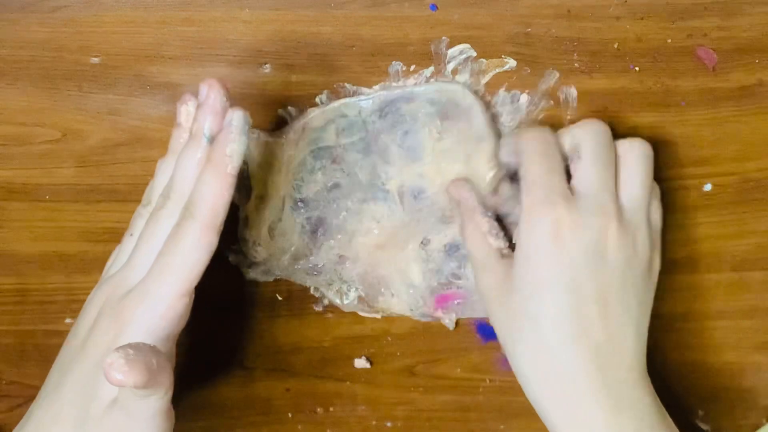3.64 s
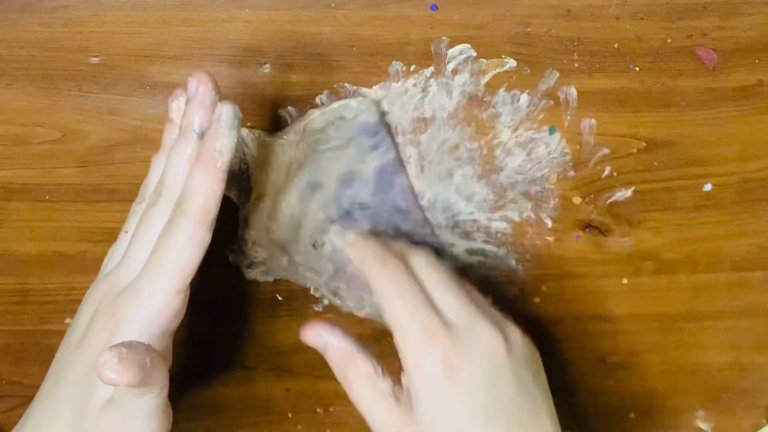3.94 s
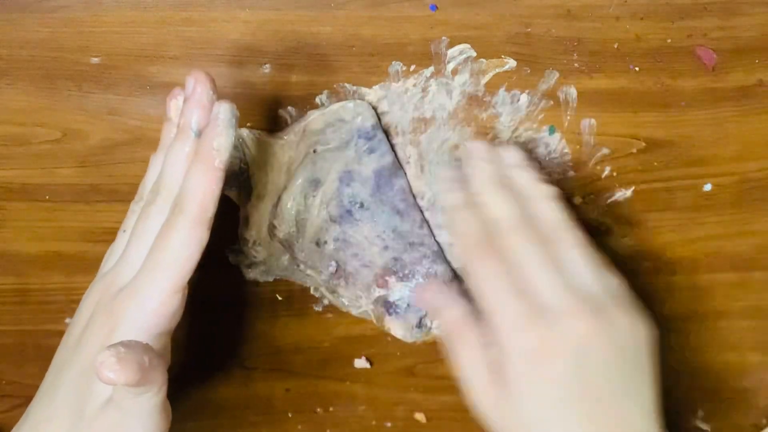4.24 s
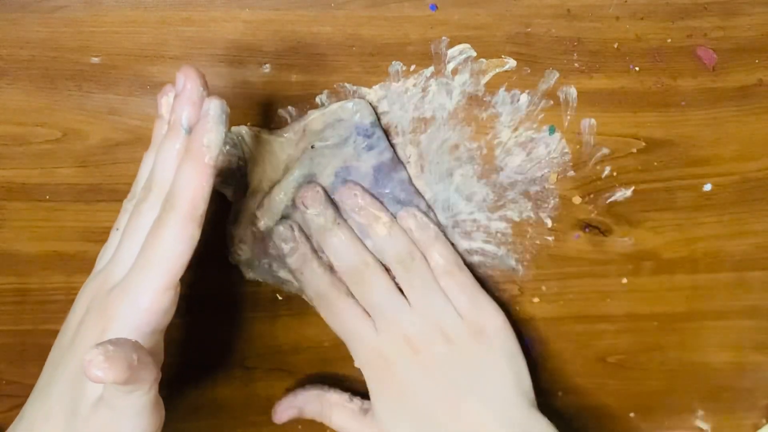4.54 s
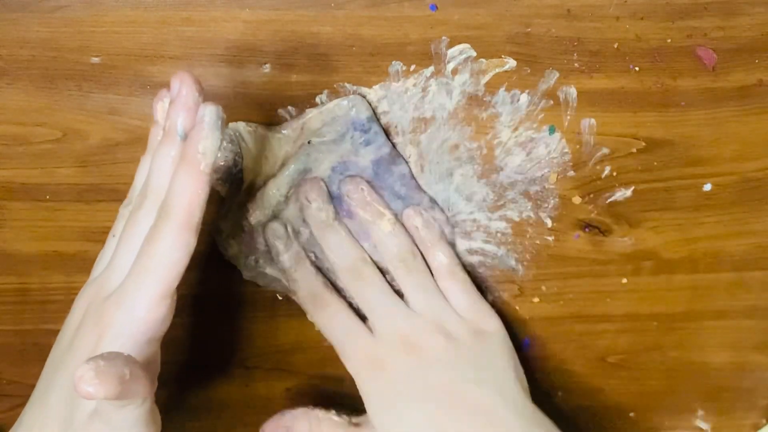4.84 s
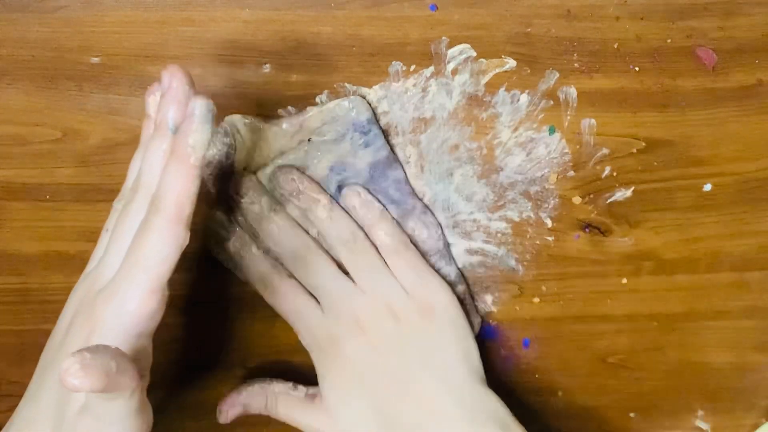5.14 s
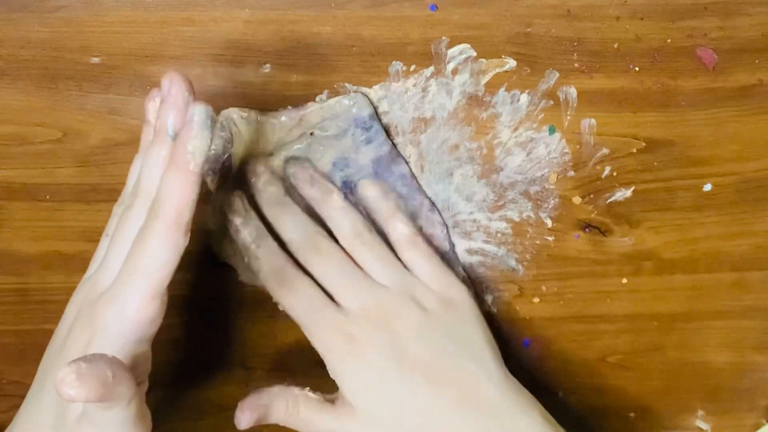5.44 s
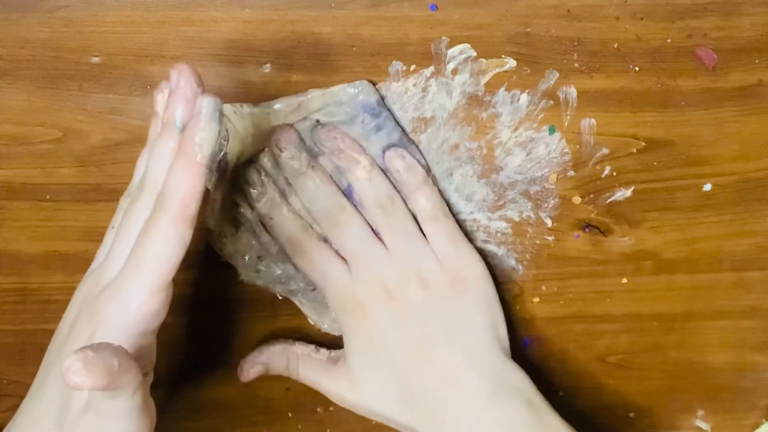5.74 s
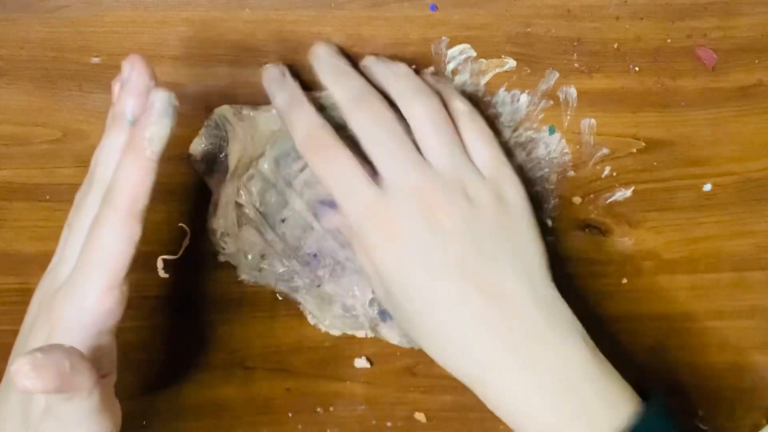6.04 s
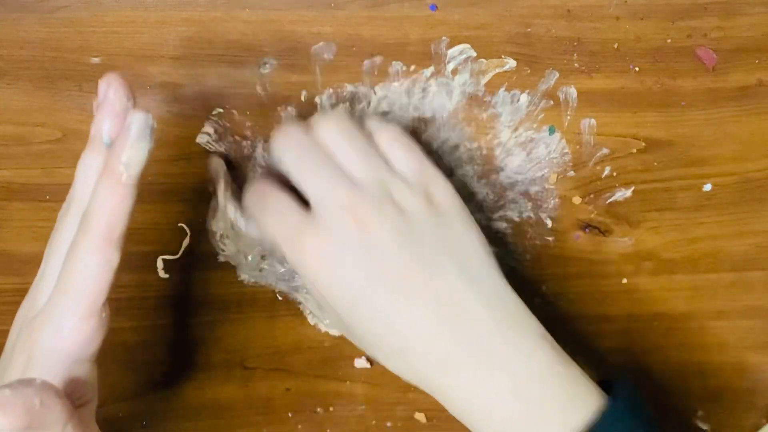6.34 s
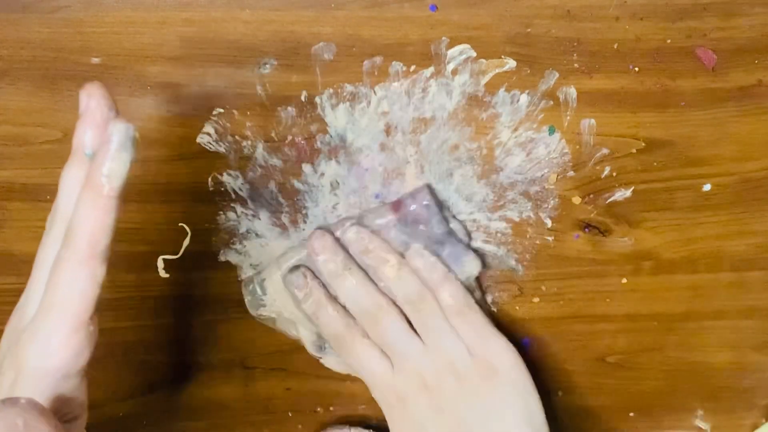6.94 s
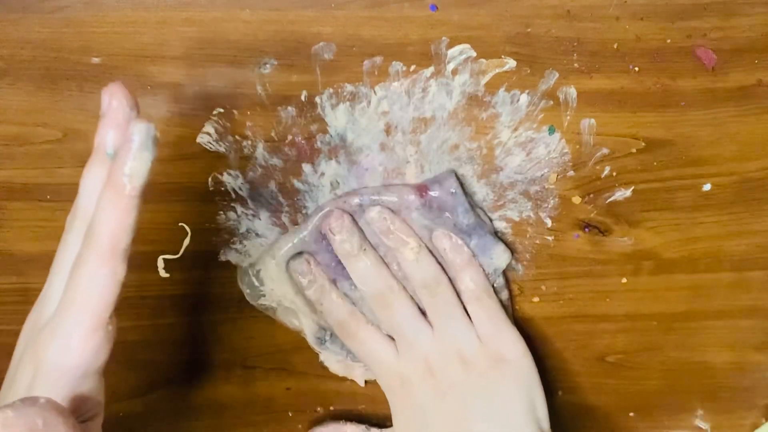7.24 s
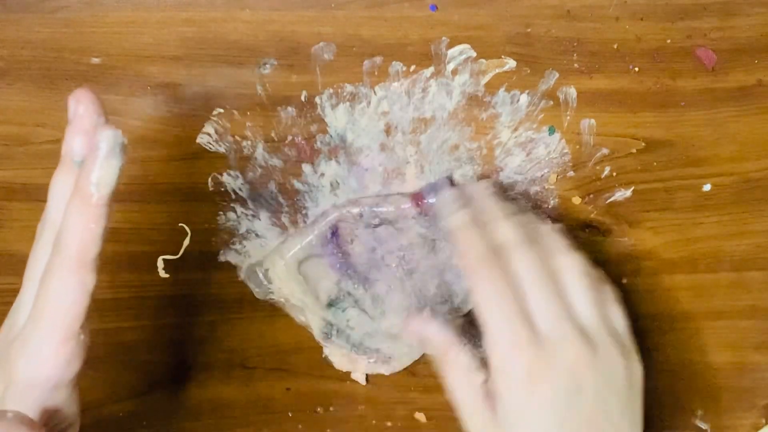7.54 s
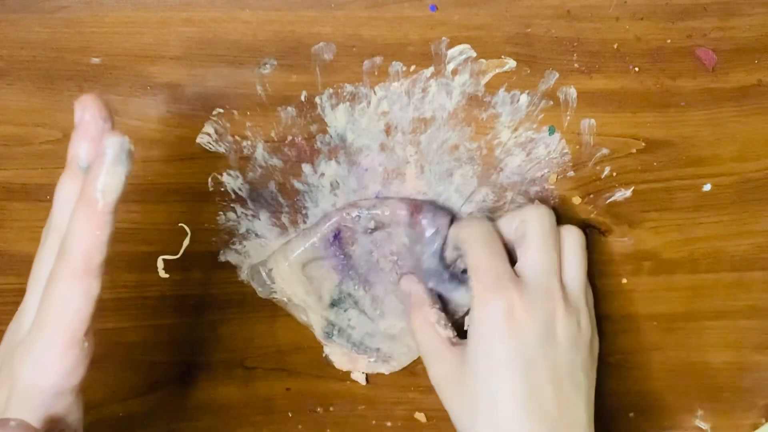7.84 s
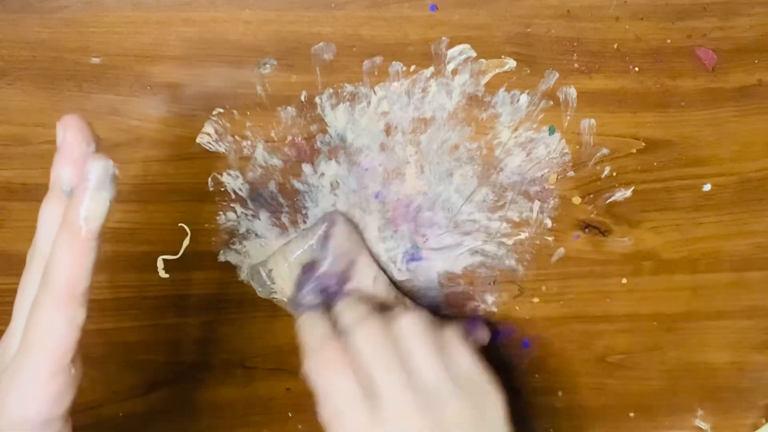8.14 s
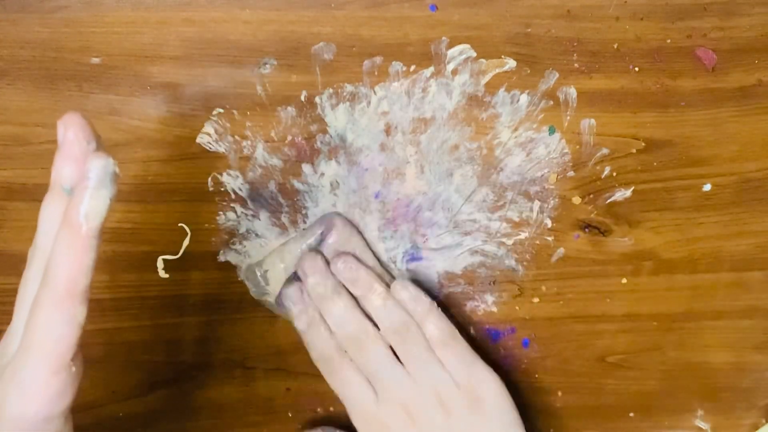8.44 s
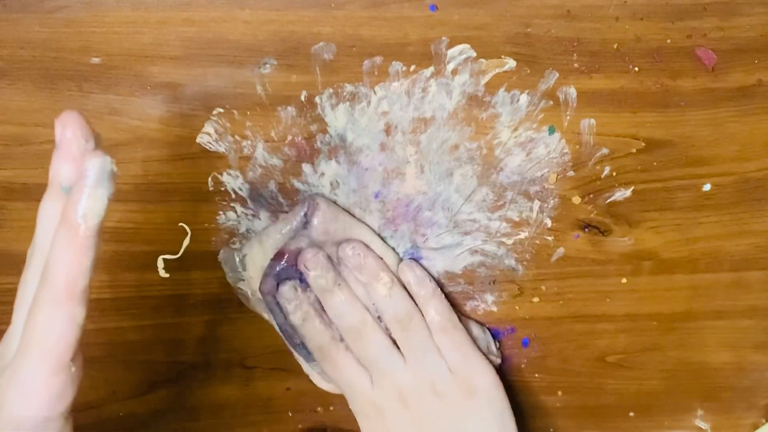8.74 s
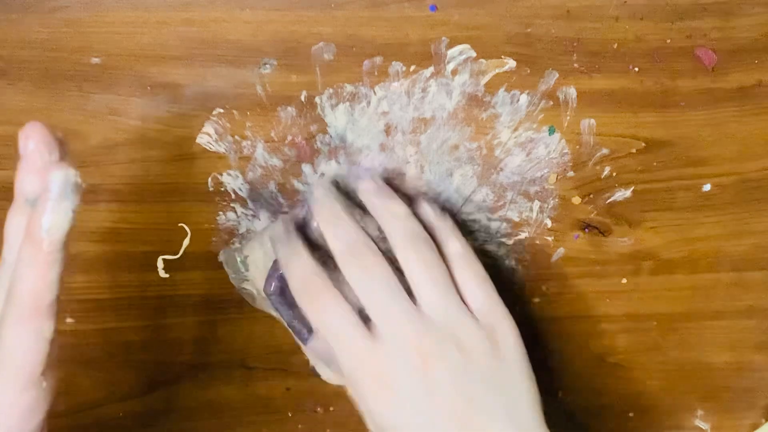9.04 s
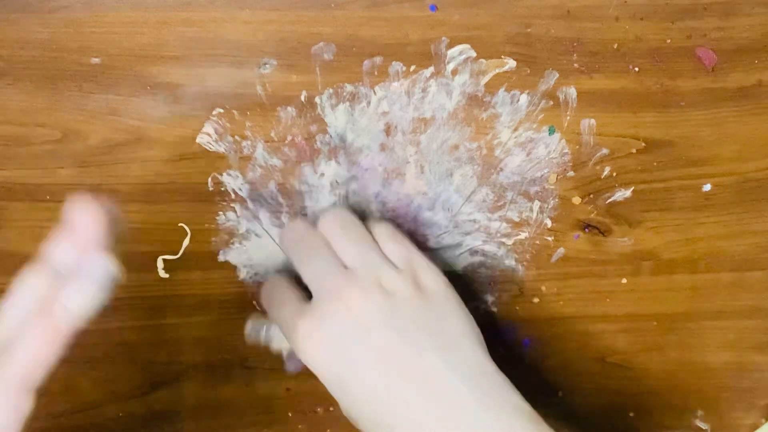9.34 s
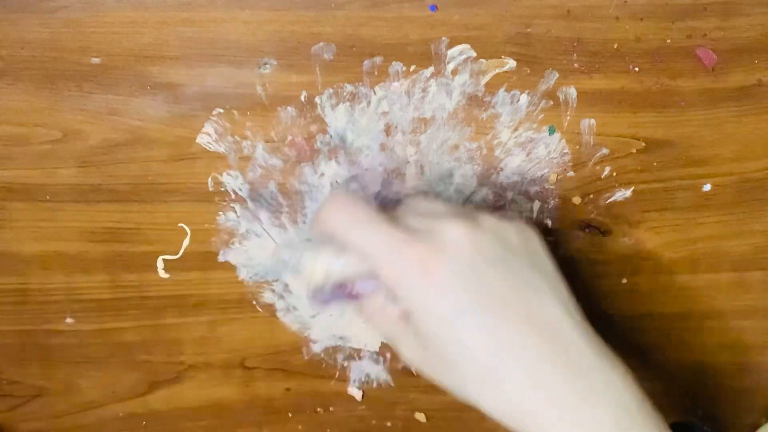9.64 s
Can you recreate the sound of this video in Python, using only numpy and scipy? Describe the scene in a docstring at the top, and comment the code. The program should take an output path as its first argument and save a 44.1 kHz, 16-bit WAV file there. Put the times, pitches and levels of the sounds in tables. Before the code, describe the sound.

Fingers knead wet slime on a wooden table, close to the microphone in a small hard room. Air pockets burst in short sticky pops, often in pairs, each with a tiny crackle and a soft thud from the table. Later the pops thin out, leaving faint skin rubbing, a few soft bubble blips and two small clinks near the end. Distant crickets chirp faintly over a low room rumble.

```python
"""Wet pops: air pockets burst as fingers knead slime on a wooden table, close up in a small hard room.
In each pop the film tears in a spray of tiny snaps, the pocket rings and the table top thuds.
Two far crickets chirp over a low room rumble, and skin rubs softly over the slime.
Late on come a faint high ringing tink, short soft bubble blips and two clinks of something small."""
import sys
import numpy as np
from scipy import signal
from scipy.fft import rfft, irfft, next_fast_len
from scipy.io import wavfile
from scipy.ndimage import uniform_filter1d

SR = 44100
rng = np.random.default_rng(int(sys.argv[2]) if len(sys.argv) > 2 else 0)


def generate_wav(sig):
    """Save sig (samples, or channels by samples) to the path in sys.argv[1] as 16-bit PCM at SR."""
    pcm = np.round(np.clip(np.atleast_2d(sig).T, -1, 1) * 32767).astype(np.int16)
    wavfile.write(sys.argv[1], SR, pcm)


N = 431738
TIME_S = np.arange(N) / SR

# bursting pockets: start_s, tear_s, thud_db, ring_db, snap_db, lower_ring_hz, upper_ring_hz
POCKETS = [(0.0001, 0.00072, -33.5, -30, -35.5, 1330, 1420),
           (0.1924, 0.0016, -34.5, -31, -37.5, 1380, 3150),
           (0.484, 0.00097, -24.0, -29, -35.5, 730.0, 2190), (0.634, 0.0013, -36.0, -33.5, -38, 1200, 1570),
           (0.911, 0.0016, -35, -34.5, -38, 1250.0, 1750), (0.9961, 0.0011, -41.5, -42.5, -40.5, 705, 2680),
           (1.3242, 0.00061, -46, -46.5, -41.5, 1030.0, 3370), (1.413, 0.0015, -50.5, -44, -48, 910, 1435),
           (1.6711, 0.0012, -37.5, -43, -44, 1050, 2750), (1.7684, 0.0017, -49.5, -43, -46.5, 1180.0, 2110),
           (2.006, 0.0012, -31.5, -46, -40, 1100.0, 1660.0),
           (2.098, 0.0012, -48.5, -57.5, -47.5, 1110, 1760.0),
           (2.3436, 0.0011, -33.5, -36, -36.5, 810, 2840), (2.435, 0.0015, -41, -48.5, -35, 820, 2400),
           (2.6393, 0.00061, -25.5, -29, -26.5, 950.0, 1960), (2.726, 0.001, -38.0, -37, -35, 940.0, 2350),
           (2.9027, 0.00087, -19, -28, -29.5, 1140, 2770), (2.965, 0.00054, -64, -43.5, -46.5, 1110, 1720),
           (3.1463, 0.00082, -31.0, -37.5, -35.5, 690, 2160),
           (3.221, 0.0015, -40.5, -49, -43, 1240, 2010.0), (3.4605, 0.0012, -31, -35, -33.5, 1140, 2000),
           (3.55, 0.0014, -48, -55, -53, 720, 1960), (3.7408, 0.0022, -42.5, -32.5, -39, 876, 1380),
           (3.8325, 0.0016, -41, -44.5, -43, 840.0, 3130), (4.0041, 0.0011, -43.5, -42.5, -44.5, 780, 2980),
           (4.071, 0.001, -48, -44, -41, 870, 2960), (4.2526, 0.00068, -32, -37, -37.5, 990, 2530),
           (4.3161, 0.0013, -36.5, -35, -32.5, 1245, 2900), (4.5072, 0.00063, -30, -32, -39.0, 980, 1820),
           (4.5614, 0.00093, -45, -31.5, -41.5, 804, 3150),
           (4.7378, 0.0011, -24.5, -25.5, -28.5, 810.0, 1340),
           (4.9452, 0.0011, -23.5, -28.5, -35.0, 775, 3440),
           (4.9946, 0.0017, -42, -37, -37.5, 1210, 3300.0),
           (5.1625, 0.0014, -34.5, -55.5, -40.0, 716, 2840.0),
           (5.2034, 0.00079, -51, -82, -42.0, 710.0, 1410.0),
           (5.3843, 0.00092, -35, -40.5, -42.5, 990.0, 2840),
           (5.4321, 0.0007, -49, -37, -49.5, 1280.0, 1410.0),
           (5.6089, 0.0011, -39, -41, -42.5, 910.0, 2260.0), (5.848, 0.0014, -39.5, -31, -32.5, 920, 2210),
           (5.9143, 0.0021, -47.5, -47, -43, 1230, 1653), (6.4161, 0.0013, -30.5, -31, -30, 1200, 2220),
           (6.4631, 0.00076, -64, -49, -48.5, 1120, 1410.0),
           (6.6506, 0.0011, -34.5, -43, -51.5, 1047, 2230),
           (6.7039, 0.00097, -57, -65, -52.5, 980.0, 1780.0),
           (6.8914, 0.0014, -30, -45.5, -49, 713, 2210.0), (7.1234, 0.001, -32.0, -33, -38.5, 710.0, 2090),
           (7.4029, 0.0011, -73, -63.5, -47.5, 1300, 1395),
           (8.4742, 0.0014, -45, -56.5, -44.5, 710.0, 3410), (8.5593, 0.0017, -46, -53, -51, 1080, 3400.0)]
# left-channel lag, bursts lying slightly right: freq_hz, lag_rad
LEFT_LAG = [(300, .1), (700, .6), (2500, 1.4), (5400, 4.1), (8000, 6.0), (12000, 6.8), (16000, 7.4)]
# table top response: freq_hz, gain_db
TABLE_RESPONSE = [(60, -5), (110, 7.5), (170, 3), (280, 5), (390, -4), (480, 2), (640, -15.5), (900, -22),
                  (1800, -19)]
# room rumble spectrum: freq_hz, gain_db
RUMBLE_SPECTRUM = [(25, -43.5), (50, 1.5), (68, 2), (84, -4.5), (102, 8.5), (130, -3.5), (190, -14),
                   (250, -20), (400, -21), (600, -33), (1500, -40), (4500, -42.5), (8000, -50.5),
                   (13000, -41), (16000, -54.5)]
# cricket timing: rate_hz, offset_s
CRICKET_CLOCKS = [(7.759, .012), (7.168, .093)]
# cricket wings: pitch_hz, fall_hz, level_db, chirp_s, echo_t60_s
CRICKET_WINGS = [(6590, 730, -61.5, 0.047, .38), (6050, 440, -67.5, 0.04, 0.63)]
# skin strokes on slime: centre_s, length_s, hiss_db, rustle_db
SKIN_STROKES = [(3.417, 0.18, -63.5, -85), (7.533, 0.37, -64, -75), (7.96, 0.68, -68, -74.5),
                (8.845, .45, -72, -103), (9.233, 0.24, -94, -80.5)]
# skin hiss spectrum: freq_hz, gain_db
HISS_SPECTRUM = [(1000, -17), (2500, -3), (5000, -0.5), (9000, 0), (11000, -4.5), (13000, -2),
                 (16000, -15.5)]
# faint high ringing tink (first row), then soft bubble blips: start_s, pitch_hz, level_db, t60_s
TINK_AND_BLIPS = [(7.335, 4620, -66, 0.5), (7.506, 562, -43.5, 0.017), (8.159, 1635, -64.5, 0.033),
                  (8.388, 1610, -51, 0.025), (8.576, 232, -43, 0.073), (9.231, 404, -50, 0.11),
                  (9.355, 2400, -63, 0.031)]
# light contacts: start_s, peak_db, damping_factor
CLINK_HITS = [(9.4616, -24, 2.5), (9.5865, -28, 3.5)]
# clink modes: pitch_hz, base_width_hz, relative_db
CLINK_RESONANCES = [(2430, 100, -16.5), (4885, 11, -2), (5510, 46, 0), (6860, 80, -28), (8700, 150, -3),
                    (10440, 200, -7), (11900, 140, -5.5)]
# left-right likeness of diffuse sound: freq_hz, correlation
STEREO_CORRELATION = [(60, 0.95), (300, 0.78), (600, 0.22), (1300, 1), (3000, -0.6), (5500, 0.0092),
                      (7200, -0.68), (9000, 1), (16000, .93)]
# room echo energy: freq_hz, level_db
ECHO_LEVELS = [(100, -6), (300, -10.5), (700, -7), (1500, -4.5), (3000, -12), (6000, -10), (9000, -11.5),
               (15000, -21.5)]
# room echo decay: freq_hz, t60_s
ECHO_DECAYS = [(100, 0.27), (400, 0.33), (1500, 0.3), (6000, 0.24), (15000, 0.23)]


def from_db(db):
    return 10 ** (np.asarray(db) / 20)


def unit_rms(x):
    return x / np.sqrt(np.mean(x ** 2) + 1e-20)


def at_hz(table, hz):
    """Table lookup on a log-frequency axis."""
    freqs_hz, values = np.array(table).T
    return np.interp(np.log(hz + 1e-9), np.log(freqs_hz), values)


def band(x, low_hz, high_hz, order=2):
    sos = signal.butter(order, [low_hz, min(high_hz, .48 * SR)], "band", fs=SR, output="sos")
    return signal.sosfilt(sos, x)


def resonance(x, hz, width_hz):
    """Two-pole resonator, unity peak gain."""
    r = np.exp(-np.pi * width_hz / SR)
    feedback = [1, -2 * r * np.cos(2 * np.pi * hz / SR), r * r]
    return signal.lfilter(np.array([1, 0, -1]) * (1 - r * r) / 2, feedback, x)


def add(out, start_s, sound):
    start = max(0, round(start_s * SR))
    out[..., start:start + sound.shape[-1]] += sound[..., :N - start]


def pan_left(x, db):
    return x * from_db([[db], [-db]])


def burst_level(x, db):
    """Scales to the energy of 10 ms at this level."""
    return from_db(db) * x / np.sqrt(np.mean(np.sum(x ** 2, -1)) * 100 / SR + 1e-20)


def near(pair, side_db=-11):
    """Direct sound: nearly alike in both channels, later on the left."""
    hz = np.fft.rfftfreq(pair.shape[-1], 1 / SR)
    mid, side = rfft(pair)
    stereo = mid + from_db(side_db) * side * [[1], [-1]]
    stereo[0] *= np.exp(-1j * at_hz(LEFT_LAG, hz))
    return irfft(stereo, pair.shape[-1])


def diffuse(pair, spectrum=None, left_lag_s=.000011):
    """Two unrelated signals to stereo, correlation set by frequency."""
    size = pair.shape[-1]
    fft_size = next_fast_len(size)
    hz = np.fft.rfftfreq(fft_size, 1 / SR)
    mid, side = rfft(pair, fft_size) * (from_db(at_hz(spectrum, hz)) if spectrum else 1)
    alike = np.clip(at_hz(STEREO_CORRELATION, hz), -1, 1)
    stereo = np.sqrt(1 + alike) * mid + np.sqrt(1 - alike) * side * [[1], [-1]]
    stereo[0] *= np.exp(-2j * np.pi * hz * left_lag_s)
    return irfft(stereo, fft_size)[:, :size]


def tear(t, tear_s, first_snap=3.6, grain_db=5.0):
    """Film gives way: one snap, then a spray of smaller ones that swells and dies in milliseconds."""
    sizes = from_db(grain_db * rng.standard_normal(len(t)))
    progress = t / (1.66 * tear_s)
    spray = rng.standard_normal((2, len(t))) * unit_rms(sizes) * progress * np.exp(-progress ** 1.2)
    spray[:, 1] += first_snap * rng.choice([-1, 1], 2)
    return spray


def table_thud(t, thud_db, ring_db, base_hz=370, floor_hz=233, width_oct=1.4, travel_s=.0084, lead_s=.0008):
    """Bending waves in the table top: lows travel slower, so a click becomes a falling chirp."""
    # buried pockets push slowly and low; open or hard bursts briefly and higher
    shift_oct = 0.46 * (ring_db - thud_db) + 0.15 * (thud_db + 39)
    push_hz = max(floor_hz, base_hz * 2 ** shift_oct)
    hz = np.fft.rfftfreq(len(t), 1 / SR)
    push = np.exp(-(np.log2((hz + 1) / push_hz) / width_oct) ** 2 / 2)
    delay_s = travel_s * (1 + 0.075 * rng.standard_normal()) + lead_s   # at 250 Hz
    lag_cycles = 2 * delay_s * np.sqrt(250 * hz) - lead_s * hz
    return -irfft(push * from_db(at_hz(TABLE_RESPONSE, hz)) * np.exp(-2j * np.pi * lag_cycles), len(t))


def pocket_ring(air, hz, low_hz, high_hz, thud_excess_db, smack_db=-4.0):
    """One pocket resonance over a broad wet smack; more thud than ring means more damping."""
    damping_db = .22 * np.clip(thud_excess_db, -15, 15)
    ring = resonance(air, hz, 0.092 * hz * from_db(damping_db))
    return band(ring + from_db(smack_db + damping_db) * air, low_hz, high_hz)


def film_crackle(t, length_s, ring_db, snap_db, upper_hz, db_per_oct=3, ref_hz=1970):
    """Film crackle: level follows snap and ring; small, high-ringing pockets crackle more."""
    level_db = snap_db - 2.5 + 0.27 * (ring_db - snap_db) + db_per_oct * np.log2(upper_hz / ref_hz)
    crackle = band(near(tear(t, length_s, first_snap=2.1)), 3600, 7500, order=3)
    return burst_level(pan_left(crackle, 1.2), level_db)


def pops(air_extra_s=0.00069, crackle_extra_s=.0006, ring_trim_db=-2.5):
    """Pockets burst: table thud, two pocket rings, crackle and bright snap of the film."""
    out, t = np.zeros((2, N)), np.arange(4096) / SR
    fade = np.clip(2 - 2 * t / t[-1], 0, 1) ** 2
    for start_s, tear_s, thud_db, ring_db, snap_db, lower_hz, upper_hz in POCKETS:
        air = near(tear(t, tear_s + air_extra_s, first_snap=1.7))
        burst = burst_level(pan_left(table_thud(t, thud_db, ring_db), .6), thud_db)
        for hz, low_hz, high_hz in (lower_hz, 550, 1750), (upper_hz, 1200, 3100):
            ring = pocket_ring(air, hz, low_hz, high_hz, thud_db - ring_db)
            burst += burst_level(ring, ring_db + ring_trim_db)
        burst += film_crackle(t, tear_s + crackle_extra_s, ring_db, snap_db, upper_hz)
        snap = band(near(tear(t, tear_s)), 8220, 16300, order=4)
        burst += burst_level(snap, snap_db)
        add(out, start_s, burst * fade)
    return out


def rumble(level_db=-56.5):
    """Steady low room noise."""
    noise = diffuse(rng.standard_normal((2, N)), RUMBLE_SPECTRUM)
    return pan_left(from_db(level_db) * unit_rms(noise), 1.3)


def crickets(lead_s=0.041, waver_rms_hz=150):
    """Far crickets stroke their wings, each on its own clock: falling tones smeared by echoes."""
    out, t = 0, np.arange(SR // 3) / SR
    for (rate_hz, offset_s), (hz, fall_hz, db, chirp_s, t60_s) in zip(CRICKET_CLOCKS, CRICKET_WINGS):
        stroke = np.minimum((TIME_S - offset_s + lead_s) % (1 / rate_hz) / chirp_s, 1)
        waver_hz = waver_rms_hz * unit_rms(uniform_filter1d(rng.standard_normal(N), size=60))
        pitch_hz = hz + fall_hz * (.5 - stroke) + waver_hz
        wings = np.sin(np.pi * stroke) * np.sin(2 * np.pi * np.cumsum(pitch_hz) / SR)
        echoes = rng.standard_normal((2, len(t))) * from_db(-60 * t / t60_s)
        smeared = signal.oaconvolve(wings[None], echoes, axes=1)[:, :N]
        out += from_db(db) * unit_rms(smeared)
    return pan_left(out, .6)


def rubbing(rest_hiss_db=-86, rest_rustle_db=-85.5, grain_db=1.5):
    """Skin drags on slime, never quite still: grainy hiss and soft rustle swell with each stroke."""
    hiss_gain, rustle_gain = from_db(rest_hiss_db), from_db(rest_rustle_db)
    for centre_s, length_s, hiss_db, rustle_db in SKIN_STROKES:
        speed = np.cos(np.pi * np.clip((TIME_S - centre_s) / length_s, -.5, .5)) ** 2
        hiss_gain += from_db(hiss_db) * speed
        rustle_gain += from_db(rustle_db) * speed
    grains = rng.standard_normal((2, N)) * from_db(grain_db * rng.standard_normal(N))
    hiss = unit_rms(diffuse(grains, HISS_SPECTRUM))
    rustle = unit_rms(band(grains, 200, 1050))
    return hiss_gain * hiss + rustle_gain * rustle


def tink_and_blips(rise_per_t60=0.068, attack_share=0.017):
    """A faint high ringing tink, then short soft bubble blips: dying sines, rising slightly in pitch."""
    out, t = np.zeros((2, N)), np.arange(SR // 3) / SR
    for start_s, hz, db, t60_s in TINK_AND_BLIPS:
        tone = np.sin(2 * np.pi * hz * t * (1 + rise_per_t60 * t / t60_s / 2))
        attack = 1 - np.exp(-t / (attack_share * t60_s))
        add(out, start_s, tone * attack * from_db(db - 60 * t / t60_s))
    return out


def clinks(touch_db=-20, contact_s=0.0011):
    """A tiny gritty contact rings a few modes; the slime damps them."""
    out, t = np.zeros((2, N)), np.arange(SR // 4) / SR
    for start_s, peak_db, damping in CLINK_HITS:
        contact = band(tear(t, contact_s)[0], 2300, 15000)
        rings = sum(from_db(mode_db) * unit_rms(resonance(contact, hz, width_hz * damping))
                    for hz, width_hz, mode_db in CLINK_RESONANCES)
        clink = (rings + from_db(touch_db) * contact) * (1 - t / t[-1]) ** 2
        add(out, start_s, from_db(peak_db) * clink / np.abs(clink).max())
    return out


def room(x, gap_s=0.0053, build_s=0.001, bands=10):
    """Diffuse echoes: fast build-up, separate decay per band."""
    t = np.arange(int(.6 * SR)) / SR
    edges_hz, response = np.geomspace(70, 18000, bands + 1), 0
    onset = 1 - np.exp(-np.maximum(t - gap_s, 0) / build_s)
    for low_hz, high_hz in zip(edges_hz, edges_hz[1:]):
        hz = np.sqrt(low_hz * high_hz)
        noise = band(diffuse(rng.standard_normal((2, len(t)))), low_hz, high_hz, order=3)
        tail = noise * onset * from_db(-60 * t / at_hz(ECHO_DECAYS, hz))
        band_share = 2 * (high_hz - low_hz) / SR
        response += unit_rms(tail) * from_db(at_hz(ECHO_LEVELS, hz)) * np.sqrt(band_share / len(t))
    return signal.fftconvolve(x, response, axes=1)[:, :N]


def scene():
    direct = pops() + tink_and_blips() + clinks()
    return direct + room(direct) + rubbing() + crickets() + rumble()


def record(dry):
    """Steep low-pass."""
    cutoff_hz = 15900
    return signal.sosfilt(signal.ellip(10, .3, 80, cutoff_hz, fs=SR, output="sos"), dry)


dry = scene()
out = record(dry)
generate_wav(out)
```